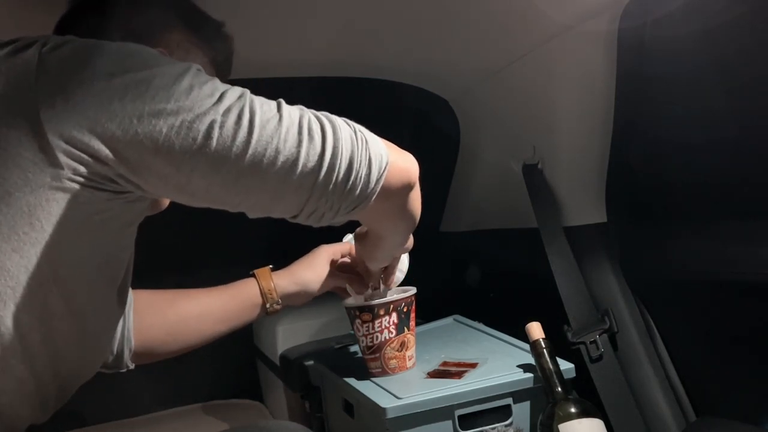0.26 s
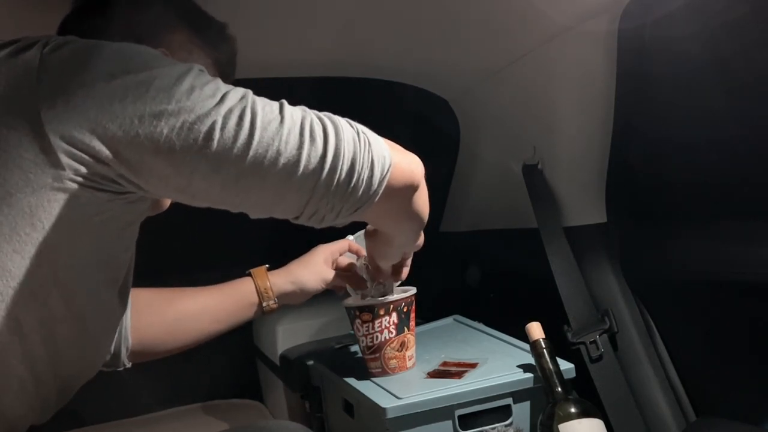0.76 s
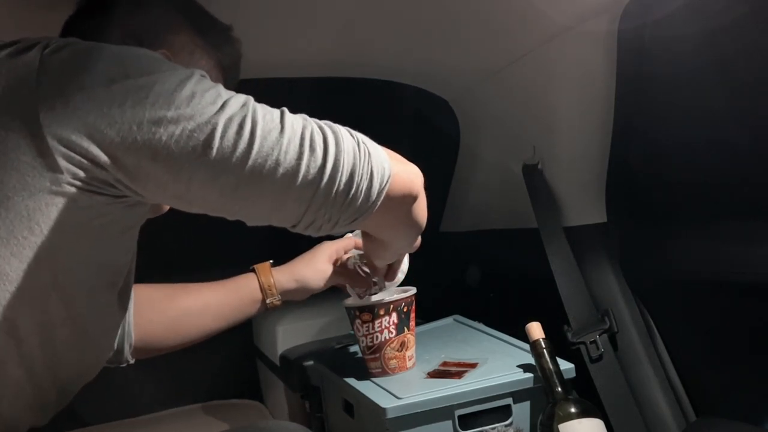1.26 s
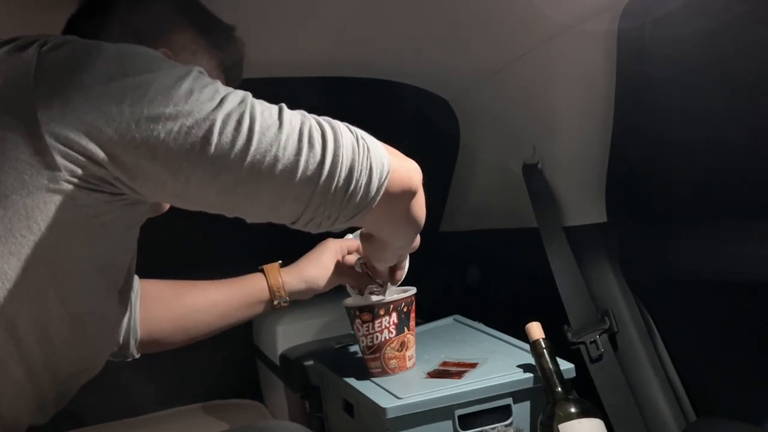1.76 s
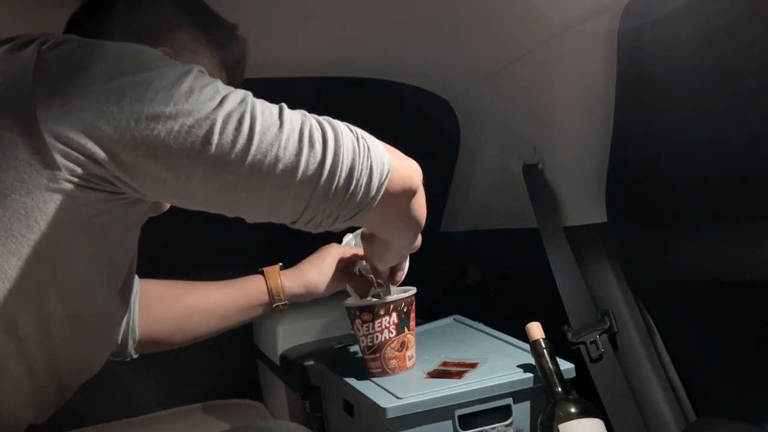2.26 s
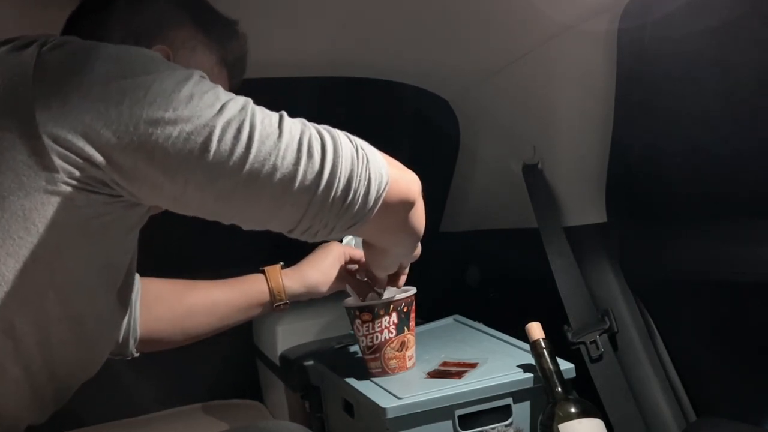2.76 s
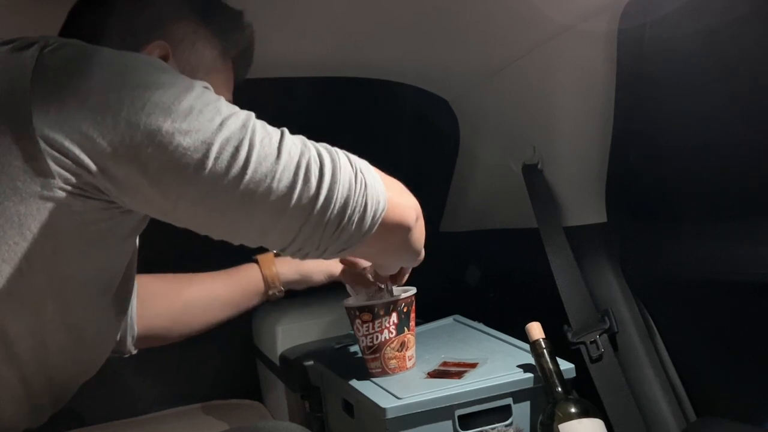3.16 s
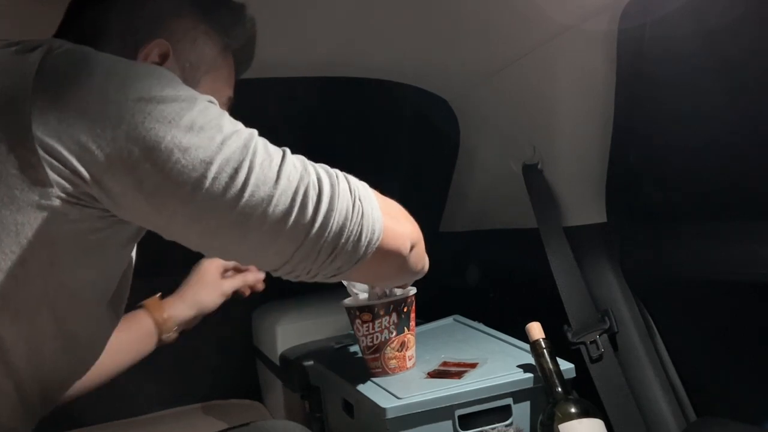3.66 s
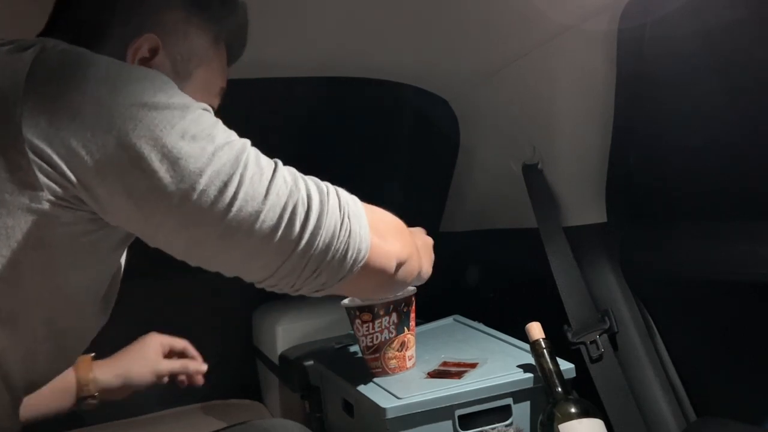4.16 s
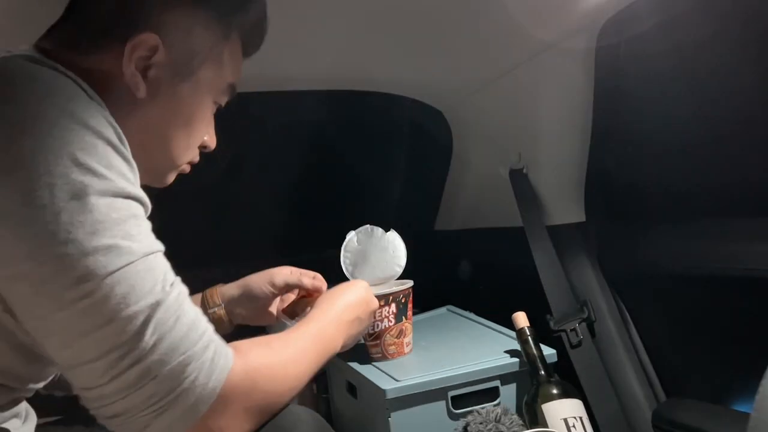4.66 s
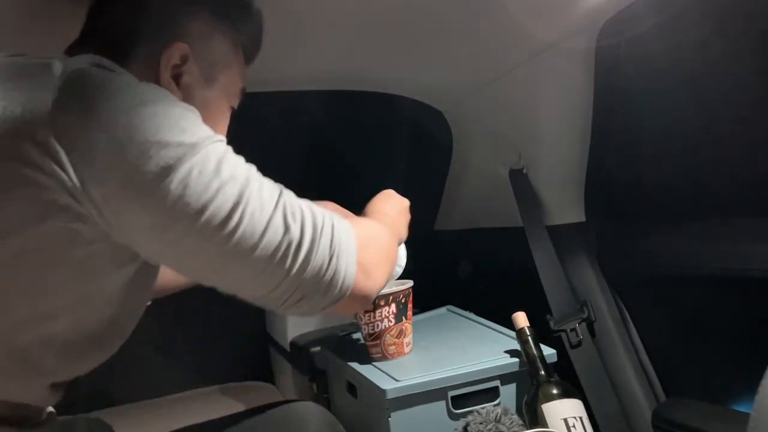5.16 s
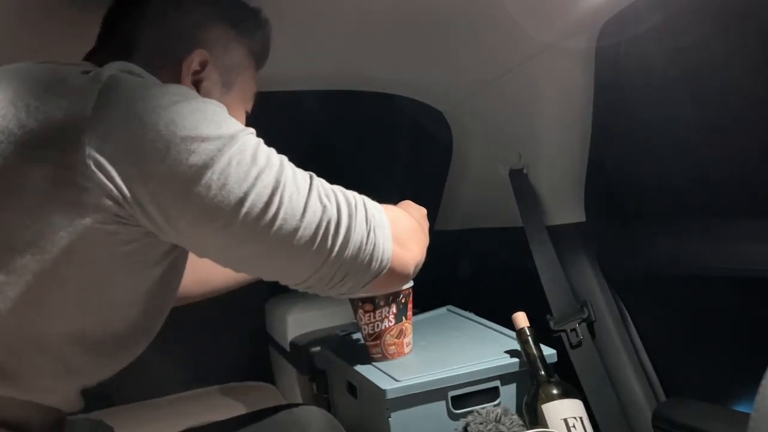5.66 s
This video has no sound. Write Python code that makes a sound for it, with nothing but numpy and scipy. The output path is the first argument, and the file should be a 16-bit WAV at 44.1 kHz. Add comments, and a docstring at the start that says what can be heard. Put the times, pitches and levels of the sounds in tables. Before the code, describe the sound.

Brittle plastic or foil film crackles in irregular bursts, with tiny crisp pops and swelling rustles, as hands squeeze and tear it. The busiest handling ends near three seconds, a near-hush follows, then small dull-hollow taps and faint paper rubbing come from a noodle cup. The cabin is dry and tight, with only a very short diffuse tail, soft rumble and slight hiss; the pickup is close stereo.

```python
"""Foil film snaps and crackles in bursts as hands work a sachet and a paper lid over a noodle cup
in a parked car at night. Shaped noise makes the snaps and rustle; drifting tones ring film and cup.
Soft low pushes thud beneath, noise tails make the cabin's brief answer, and filtered noise makes a
low rumble and a faint hiss. Two microphone ports hear nearly the same sound, apart in phase in the treble."""
import sys
import numpy as np
from scipy import signal
from scipy.fft import rfft, irfft, next_fast_len
from scipy.io import wavfile
from scipy.ndimage import uniform_filter1d, map_coordinates

SR = 44100
rng = np.random.default_rng(int(sys.argv[2]) if len(sys.argv) > 2 else 0)


def wrap_up_sound(samples):
    """Save the sound to the file named by the first command line argument, as 16-bit audio."""
    columns = np.atleast_2d(samples).T
    # keep every value between -1 and 1, then stretch to whole-number steps
    tamed = np.clip(columns, -1, 1)
    steps = np.round(tamed * 32767).astype(np.int16)
    wavfile.write(sys.argv[1], SR, steps)


N = 261057
HZ = np.fft.rfftfreq(next_fast_len(N + 8192), 1 / SR)  # frequency grid, padded past the end

# resonant modes of the cup wall: f/Hz, width/Hz, level/dB
CUP_MODES = [(1490, 110, -13), (1964, 120, -0.5), (2390, 150, -3), (2632, 180, -1), (3077, 180, -2),
             (3710, 290, 0.5), (4430, 260, -9)]


def amp(db):
    """Decibels to an amplitude factor."""
    return 10 ** (np.asarray(db) / 20)


def unit(x):
    """Scale to an RMS of one."""
    return x / np.sqrt(np.mean(x ** 2) + 1e-20)


def along(points):
    """Draw a curve through (Hz, value) points on a log frequency axis."""
    f, v = np.transpose(points)
    return np.interp(np.log(HZ + 1), np.log(f + 1), v)


def filtered(x, response):
    """Multiply the spectrum of x by a response on the frequency grid."""
    size = 2 * (len(HZ) - 1)
    return irfft(rfft(x, size) * response, size)[..., :N]


def wobble(rate):
    """A smooth random curve with rate knots a second."""
    knots = rng.standard_normal(int(N * rate / SR) + 4)
    return map_coordinates(knots, [np.arange(N) * rate / SR])


def snaps():
    """Creases give way: a sharp crack rings one panel of the film, then smaller buckles die after it."""
    # creases giving way: t/s, middle drive/dB, body re middle/dB, edge re middle/dB, panel f/Hz
    creases = [(0.0239, -33.5, -8, -2.5, 4520), (0.0792, -49, -12, -7, 7400), (0.1018, -38, -9, -4, 4510),
               (0.1907, -43, -5, -3, 7100), (0.2092, -35.5, -16, -9.5, 4620),
               (0.2863, -42.5, -10, -7.5, 7180), (0.3047, -42, -11, -5, 7900),
               (0.3478, -33.5, -17, -5, 3380), (0.3859, -30.5, -8, 0, 4600), (0.4548, -28.5, -7.5, 0, 8600),
               (0.471, -39, -13, -5, 6890), (0.4979, -35, -17, -5, 3370), (0.5117, -30.5, -13.5, -4, 3700),
               (0.608, -46, -10, -7.5, 6900), (0.6489, -41, -10, -4, 3750), (0.7276, -38, -13, 1, 3210),
               (0.7428, -33, -13, 1, 7830), (0.7683, -29.5, -7, -1.5, 6840), (0.8195, -41, -6, -4, 7500),
               (0.943, -37.5, -9.5, -2, 8760), (0.9738, -42, -10, -2, 3420),
               (1.0038, -38.5, -9.5, -4, 8230), (1.041, -46, -7, -8.5, 3180), (1.1278, -38, -9, 0, 3020),
               (1.188, -42, -13, 2, 8500), (1.2098, -37, -11, -1, 4480), (1.231, -32, -16, -0.5, 7750),
               (1.272, -42, -6, -4, 5740), (1.3094, -35.5, -6.5, 0, 3330), (1.327, -35.5, -19, 1.5, 4620),
               (1.3962, -30, -12.5, 5, 7620), (1.4554, -38.5, -7.5, -2, 7500), (1.496, -41.5, -9, -2, 8000),
               (1.5723, -40.5, -10, 0, 5500), (1.6112, -32, -12, -2.5, 8700),
               (1.6195, -26.5, -12, -3, 6920), (1.6535, -28, -10, -3, 5430),
               (1.717, -32.5, -13, -3.5, 5580), (1.7554, -37.5, -6, -6, 7330),
               (1.8133, -43, -16.5, -25, 4580), (1.8336, -22.5, -22.5, -4, 4660),
               (1.8818, -36, -3, -20.5, 4470), (1.9349, -43.5, -12, -8, 7330),
               (1.9794, -49.5, -13, -12, 3500), (2.0085, -41, -6.5, 3, 5500),
               (2.0414, -34.5, -15, -5, 4520), (2.0491, -31, -9, -4, 7660), (2.0764, -32, -15, -3, 5730),
               (2.1584, -32.5, -6, -7, 8430), (2.1946, -27.5, -16, -11, 3810),
               (2.2686, -48, -0.5, -2, 7150), (2.301, -35, -10, -7, 8200), (2.3505, -35, -13, -0.5, 8720),
               (2.3875, -32, -15, 1, 8340), (2.4212, -24.5, -8.5, -3, 7630), (2.5191, -40, -13, 0, 4600),
               (2.5328, -29.5, -13, -6, 4570), (2.5458, -25.5, -15.5, -2.5, 5680),
               (2.6061, -31, -7.5, 0, 8500), (2.6379, -46, -19, -9, 8690), (2.662, -28, -15.5, 2.5, 8560),
               (2.7161, -25, -17.5, -0.5, 4620), (2.7492, -36.5, -14, 5, 8700),
               (2.8109, -48.5, -6, -2, 8900), (2.9247, -49.5, -18.5, 4.5, 4560),
               (3.0092, -43.5, -16, 8, 8440), (3.0416, -40, -7, 0, 8800), (3.0543, -38, -20, -8, 4610),
               (3.1298, -42, -13, -5, 4580), (3.1452, -39, -18, 4.5, 6580), (3.3393, -53, -10, -7, 8270),
               (3.4094, -54, -3, -2, 7740), (3.5136, -42, -5, 1, 7470), (3.5466, -34, -15, 7, 8480),
               (3.5788, -38.5, -4.5, -3, 6270), (3.6382, -37.5, -5, 3.5, 6850),
               (3.707, -38.5, -37, -0.5, 5240), (3.7663, -54, -13, -5, 7490), (4.144, -47.5, -8, 2, 5730),
               (4.4837, -49.5, -1, -5, 6060), (4.9511, -48.5, -7, 1, 8440),
               (5.0886, -43.5, -12.5, -18, 3970), (5.201, -52.5, -16, 0, 2550),
               (5.3283, -58, -15, -2, 8110), (5.3737, -57, -4, -5, 3900), (5.7977, -49, -13, -10, 2570)]
    crackle_t60 = 0.086  # s, small buckles after a snap
    t = np.arange(SR // 5) / SR
    crack = np.zeros((3, N + len(t)))
    tail = np.zeros((3, N + len(t)))
    panel = np.zeros((2, N + len(t)))
    rise = 1 - np.exp(-t / .0004)
    for s, db, body_db, edge_db, hz in creases:
        at = slice(round(s * SR), round(s * SR) + len(t))
        gains = amp(db + np.array([[0], [body_db], [edge_db]]))
        crack[:, at] += gains * rise * amp(-60 * t / 0.0045)
        tail[:, at] += gains * rise * amp(-14.5 - 60 * t / crackle_t60)
        ring_decay = amp(-60 * t / 0.011) + amp(-11.5 - 60 * t / crackle_t60)
        panel[:, at] += amp(db - 6.0) * rise * ring_decay * ringing(hz, 360, t)
    buckles = crinkle(per_s=330, spread_db=1, life_s=0.013, hush=1.0)
    crack_noise = crack[:, None, :N] * rng.standard_normal((2, N))
    return film(crack_noise + tail[:, None, :N] * buckles) + panel[:, :N]


def rustle():
    """Fingers squeeze and fold: buckles swell to each peak and fade, over a faint sliding."""
    # squeezes and folds: peak t/s, middle drive/dB, swell over 20 dB/s, fade over 20 dB/s,
    # body re middle/dB, edge re middle/dB; swells and fades below 5 ms (or negative) act as 5 ms
    squeezes = [(0.13, -61, 0.64, 0.1, -3.5, -0.5), (0.32, -54, 0.04, 0.5, -7.5, -2.5),
                (0.454, -51, 0.02, 0.09, -4, 4), (0.54, -55.5, 0.22, 0.06, -2, -3.5),
                (0.625, -65, -0.04, .1, -2, -2), (0.675, -54.5, .06, .06, -2, 1.5),
                (0.77, -63, 0.03, .05, 1, 6), (0.838, -58, -0.03, 0.13, -2, -3.5),
                (0.98, -61.5, -1.07, -0.75, -4, 4), (1.14, -57.5, .06, 0.1, -1, 4),
                (1.24, -62, 0.27, -0.44, -0.5, 1), (1.335, -57, .04, 0.11, -2.5, -2),
                (1.421, -63.5, .04, .4, -5, -7), (1.614, -52.5, 0.05, 0.14, -5, -6),
                (1.742, -50, 0.1, 0.02, -5.5, -1.5), (1.841, -44.5, 0.01, 0.056, -6.5, 1),
                (2.011, -59.5, 0.1, -0.6, 1.5, 1.5), (2.055, -47, .03, 0.13, -4.5, 0.5),
                (2.227, -47.5, 0.07, 0.02, -2.5, 0), (2.309, -56, 0.04, -0.05, -2, 0),
                (2.401, -49, 0.04, 0.03, -4.5, 3), (2.44, -45, 0.05, 0.0371, -7, 3),
                (2.552, -48.5, .05, 0.0369, -3, 4.5), (2.691, -48.5, 0.08, 0.04, -5.5, 0),
                (2.73, -43, 0.05, .06, -8, 1), (2.84, -59.5, .06, .03, -3.5, 1.5),
                (2.86, -43, .01, .03, -8, 4), (3.025, -62, .015, .1, 0, 3.5), (3.07, -58, 0.07, .06, 2, 0),
                (3.152, -57, .04, 0.0647, -2, 3), (3.539, -61.5, 0.07, 0.2447, -0.5, 1.5),
                (3.65, -73, 0, 0.07, 3, 7), (4.141, -73, 0.12, 0.06, 2, 5), (4.5, -79.5, 0.13, 0, 0, 1.5),
                (4.72, -69, 0, 0.17, 0, -2), (4.8, -65, 0.25, 0.04, -4, 0), (5.09, -70, .05, 0.12, 5, 0),
                (5.42, -81, 0.3, 0, 6, -3), (5.545, -85, .015, 0.22, 15, 1), (5.795, -70, .05, .08, 9, -4)]
    # faint sliding between the squeezes: t/s, middle drive/dB
    slide = [(0, -74), (2.8, -79), (3.0, -92), (3.4, -83), (3.76, -79), (3.92, -84), (4.05, -79),
             (4.25, -90), (4.9, -79.5), (5.3, -81), (5.92, -89)]
    slide_body_db, slide_edge_db = -5, 0  # relative to the middle
    on_paper_s = 4.55  # from here the fingers rub the paper lid, which slides more evenly than foil
    at_cup_s = 5  # from here the fingers hold the cup, and its wall takes over the body of the rustle
    t = np.arange(N) / SR
    slide_db = np.interp(t, *np.transpose(slide))
    power = amp(2 * (slide_db + np.array([[0], [slide_body_db], [slide_edge_db]])))
    for s, db, swell_s, fade_s, body_db, edge_db in squeezes:
        before = (s - t) / max(swell_s, .005)
        after = (t - s) / max(fade_s, .005)
        level_db = db - 20 * np.where(t < s, before, after)
        power = power + amp(2 * level_db) * amp(2 * np.array([[0], [body_db], [edge_db]]))

    clumps = amp(0.96 * wobble(33))
    foil = unit(clumps * crinkle(per_s=250, spread_db=6.0, life_s=0.024, hush=0.98))
    paper = crinkle(per_s=400, spread_db=3, life_s=0.02, hush=2.5)
    drives = np.sqrt(power)[:, None] * np.where(t > on_paper_s, paper, foil)
    middle, body, edge = drives

    held = t > at_cup_s
    wall = 0
    for k, (mode, width, gain_db) in enumerate(CUP_MODES):
        resonance = 1j * HZ * width / (mode ** 2 - HZ ** 2 + 1j * HZ * width)
        wall = wall + amp(gain_db) * resonance * (-1) ** k  # neighbouring modes alternate in sign
    cup = filtered(body * held, wall / np.sqrt(np.mean(np.abs(wall) ** 2)))
    return film([middle, body * (1 - 0.65 * held), edge]) + cup


def film(ranges):
    """Send middle, body and edge drives each through its own range of the film's spectrum."""
    # colour of the film: f/Hz, relative spectral level/dB
    colour = [(300, -31), (750, -19), (1200, -16), (2200, -11), (3300, -2.5), (4600, 1), (6000, 1.5),
              (7500, 5.5), (9000, 11), (10000, 7), (12500, 4.5), (14800, 4), (15900, -7), (16250, -46)]
    body = 1 / (1 + (HZ / 2800) ** 6)
    edge = 1 - 1 / (1 + (HZ / 8200) ** 10)
    shapes = amp(along(colour)) * np.array([1 - body - edge, body, edge])
    shapes = shapes / np.sqrt(np.mean(shapes ** 2, axis=1, keepdims=True))
    return sum(filtered(drive, shape) for drive, shape in zip(ranges, shapes))


def crinkle(per_s, spread_db, life_s, hush):
    """Tiny buckles of the film, each a tick of its own size and length, over an even hush of sliding."""
    at, size, length = rng.random((round(per_s * N / SR), 3)).T[..., None]
    t = np.arange(400) / SR
    strength = (size + 0.077) ** (-spread_db / 9.4)  # many small ticks, few large
    fade = strength * amp(-60 * t / (life_s * (0.27 + length)))
    index = ((at * N).astype(int) + np.arange(len(t))).ravel()
    envelope = np.sqrt(np.bincount(index, (fade ** 2).ravel(), N + len(t))[:N])  # ticks add in power
    noise = (unit(envelope) + hush) * rng.standard_normal((2, N))
    return unit(patches(noise, depth_db=4))


def patches(x, depth_db):
    """Each moment of the film favours other bands: a random gain over about 1 kHz by 10 ms."""
    z = signal.stft(x, nperseg=128)[2]
    field = rng.standard_normal(z.shape[1:])
    field = uniform_filter1d(field, size=4, axis=0)  # across frequency
    field = uniform_filter1d(field, size=6, axis=1)  # across time
    return signal.istft(z * amp(depth_db * unit(field)), nperseg=128)[1][:, :N]


def ringing(hz, width_hz, t):
    """An unsteady tone: random phase drift spreads it into a narrow band around hz, for both parts."""
    drift = np.cumsum(rng.standard_normal((2, len(t))), axis=1) * np.sqrt(2 * np.pi * width_hz / SR)
    return np.sin(2 * np.pi * hz * t + drift)


def taps():
    """A tick and a short hollow ring of the cup wall; modes near the favoured pitch are favoured."""
    # fingers and lid touching the paper cup: t/s, drive/dB, favoured f/Hz
    touches = [(3.8256, -50, 2450), (3.8613, -59.5, 1930), (4.1432, -48.5, 2210), (4.3924, -46.5, 2780),
               (4.4842, -57, 3010), (4.6543, -59.5, 3980), (4.6817, -59.5, 2070), (4.698, -51, 1980),
               (4.7256, -49.5, 1900), (4.787, -47.5, 2340), (4.8033, -40.5, 2160), (4.8432, -51.5, 2000),
               (4.952, -49, 2100), (5.0496, -50, 2600), (5.069, -47, 3780), (5.1826, -45.5, 2340),
               (5.2586, -52, 2400), (5.328, -50, 1530), (5.4365, -52.5, 3870), (5.5285, -44, 2620),
               (5.5516, -41.5, 2970), (5.588, -54, 2600), (5.645, -57.5, 2600), (5.7722, -51, 2700),
               (5.8012, -40, 2600), (5.8343, -53, 2420)]
    cup_t60 = 0.083  # s, ring of the wall
    out, t = np.zeros((2, N + SR)), np.arange(SR // 5) / SR
    rise = 1 - np.exp(-t / .0004)
    shape = amp(-60 * t / 0.0047) + amp(-12.0 - 60 * t / cup_t60)
    for s, db, hz in touches:
        wall = 0
        for mode, width, gain_db in CUP_MODES:
            off_pitch_db = 40 * abs(np.log2(mode / hz))  # 40 dB per octave away
            wall = wall + amp(gain_db - off_pitch_db) * ringing(mode, width, t)
        out[:, round(s * SR):][:, :len(t)] += amp(db) * rise * shape * wall
    return out[:, :N]


def pushes():
    """Soft pushes on the seat and box: a few cycles of low thud with a soft start."""
    # pushes: t/s, level before a 9 dB lift and the envelope/dB, f/Hz
    thuds = [(0.201, -49.5, 73.5), (0.38, -41.5, 52), (0.638, -40, 74.3), (0.919, -49.5, 44),
             (1.178, -43.5, 66.6)]
    out, t = np.zeros((2, N + SR)), np.arange(SR // 4) / SR
    soft_start = 1 - np.exp(-t / 0.0056)
    for s, db, hz in thuds:
        thud = amp(db + 9.0 - 60 * t / 0.14) * soft_start * np.sin(2 * np.pi * hz * t)
        out[:, round(s * SR):][:, :len(t)] += thud * [[1], [2.5]]  # carried by the structure, so uneven at the ports
    return out[:, :N]


def cabin(x):
    """Glass and seats return a short diffuse tail, a new one every fifth of a second as the hands move."""
    cabin_t60 = 0.067  # s
    t, step = np.arange(SR // 5) / SR, SR // 5
    out = np.zeros((2, N + 2 * step))
    for start in range(0, N, step):
        tail = rng.standard_normal((2, len(t))) * amp(-60 * t / cabin_t60) * (t > .002)
        tail = tail / np.linalg.norm(tail[0])
        wet = signal.fftconvolve(x[None, start:start + step], tail, axes=1)
        out[:, start:start + wet.shape[1]] += wet
    return out[:, :N]


def night():
    """Distant rumble through the car body and a faint hiss, both filtered noise that wavers in level."""
    # colour of the rumble: f/Hz, relative spectral level/dB
    rumble_colour = [(12, -22), (20, -21), (42, -7), (69, 1.5), (125, -8), (149, -14.5), (215, -14.5),
                     (277, -18.5), (352, -18.5), (393, -25), (831, -33.5), (900, -31.5), (1170, -90),
                     (1980, -120)]
    # colour of the hiss, with bands near 1.4 and 7.5 kHz: f/Hz, relative spectral level/dB
    hiss_colour = [(600, -7), (850, 2), (1080, -0.5), (1400, 8.5), (1700, -1.5), (3000, -9), (5300, -6.5),
                   (6400, -2), (7000, -1.5), (7500, 8), (8500, -5), (10000, -23), (12000, -7.5),
                   (15400, -5), (16000, -42)]
    rumble = unit(filtered(rng.standard_normal((2, N)), amp(along(rumble_colour))))
    hiss = unit(filtered(rng.standard_normal((2, N)), amp(along(hiss_colour))))
    return amp(-52.5 + 0.39 * wobble(3.5)) * rumble + amp(-77 + 0.4 * wobble(7.3)) * hiss


def scene():
    """Each source gives a common part and a part of opposite sign at the two ports."""
    # gain of the part that differs between the ports: f/Hz, level/dB
    apart = [(30, -23.5), (200, -13.5), (400, -13), (700, -0.5), (1200, -3.5), (2000, -31), (3000, -7.5),
             (7000, -20), (8500, -3.5), (10000, -23), (11700, 0), (13300, -12), (14800, -12)]
    hands = snaps() + taps() + rustle()
    hands = hands + amp(-9.0) * cabin(hands[0])
    near = hands * amp([[0], [-2]])  # near sounds are more alike at the ports
    common, other = near + pushes() + night()
    other = filtered(other, amp(along(apart)))
    return np.array([common + other, common - other])


def record(dry):
    """The ports differ in phase, half on each side; nothing is kept above the band limit."""
    # lead of the left port over the right: f/Hz, phase/rad
    phase_lead = [(0, -.15), (600, -.1), (1900, 0), (3600, .5), (5300, 0), (5900, -.2), (6400, 0),
                  (7400, -.1), (8500, -1.2), (9400, -3), (10500, -3.3), (11600, -4.4), (12600, -6.1),
                  (14000, -6.4), (14700, -7), (15700, -9)]
    top_hz = 16500
    turn = np.exp(.5j * along(phase_lead) * np.array([[1], [-1]]))
    return filtered(dry, turn * (HZ < top_hz))


dry = scene()
out = record(dry)
wrap_up_sound(out)
```